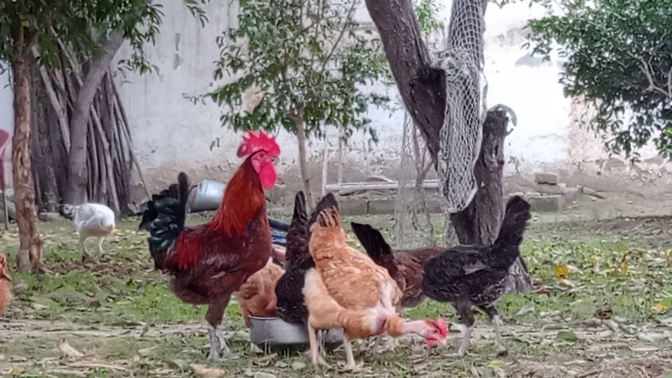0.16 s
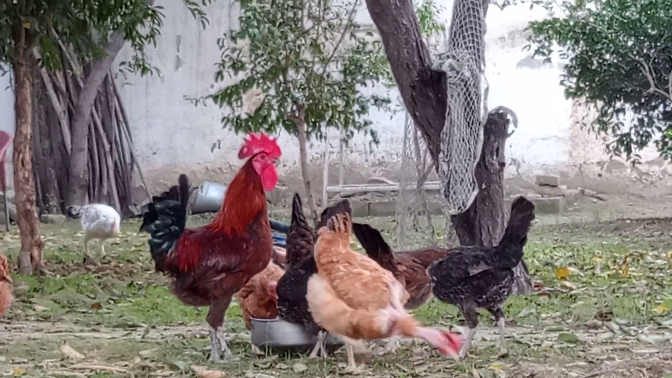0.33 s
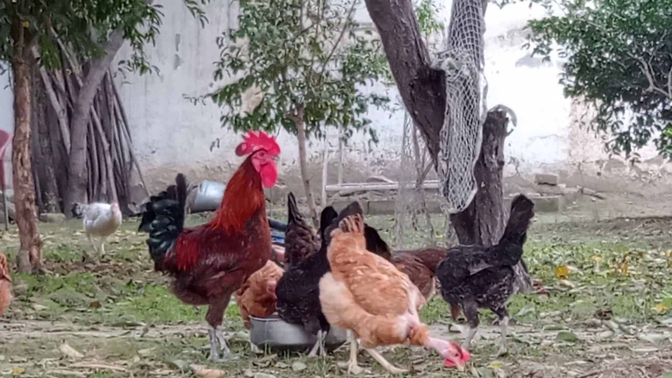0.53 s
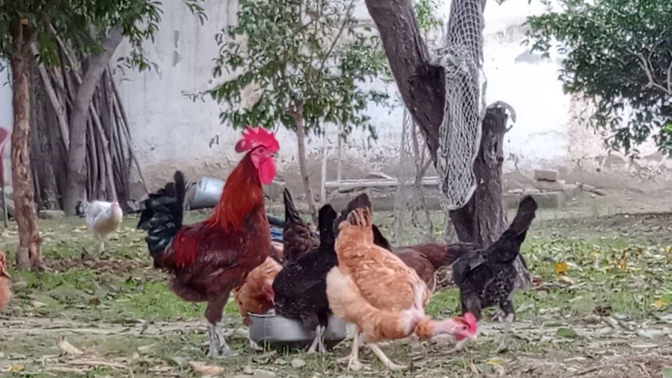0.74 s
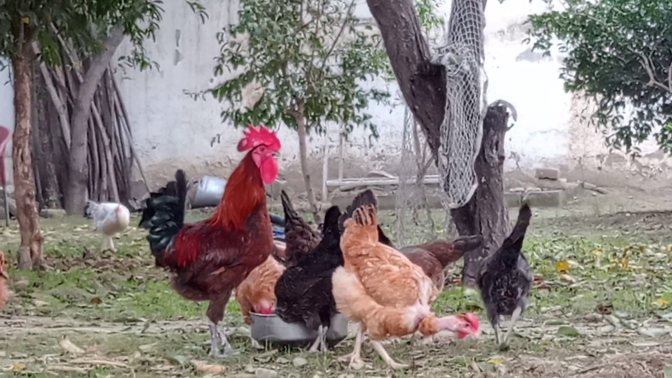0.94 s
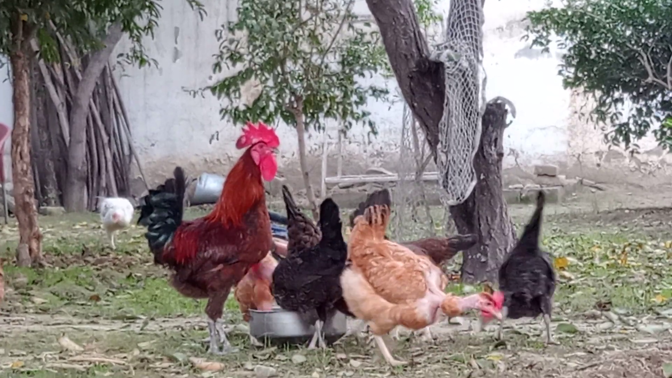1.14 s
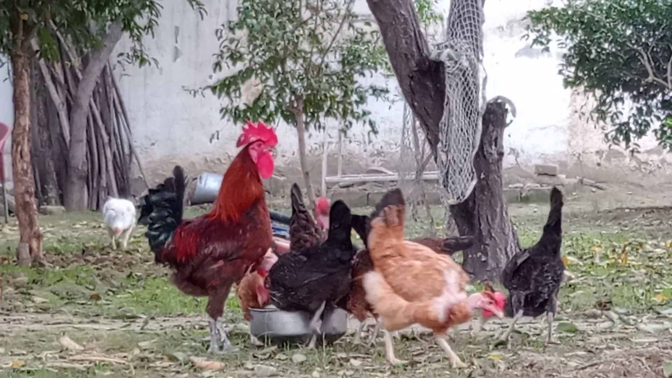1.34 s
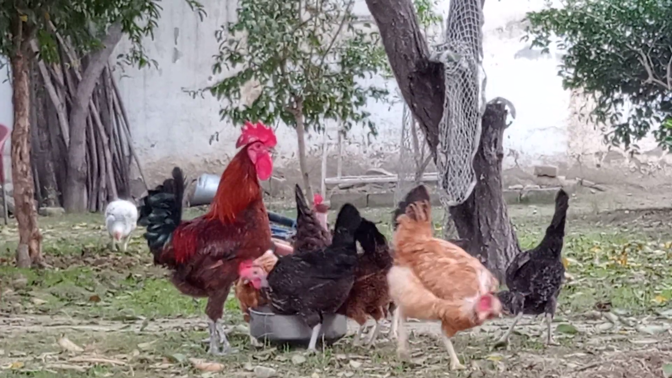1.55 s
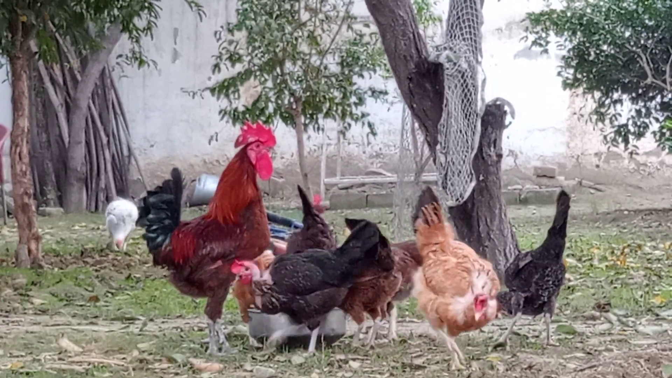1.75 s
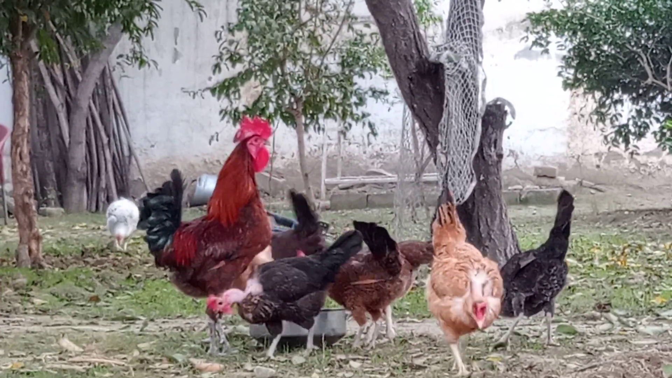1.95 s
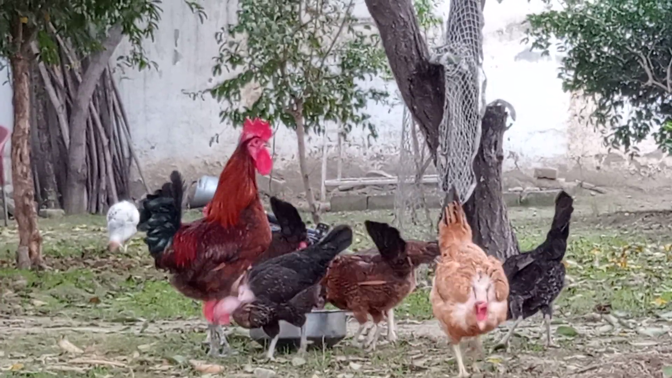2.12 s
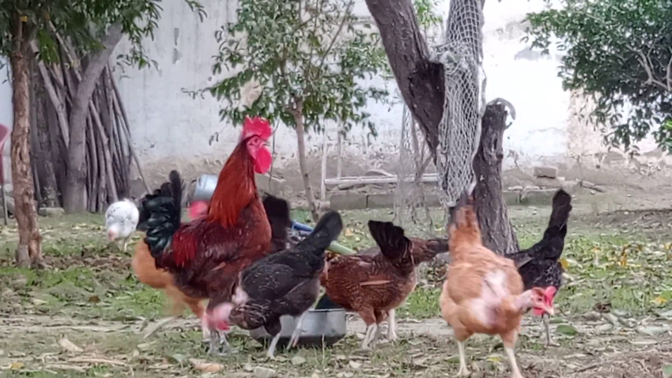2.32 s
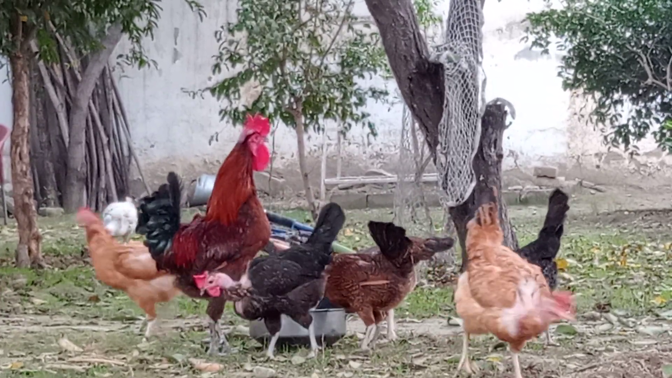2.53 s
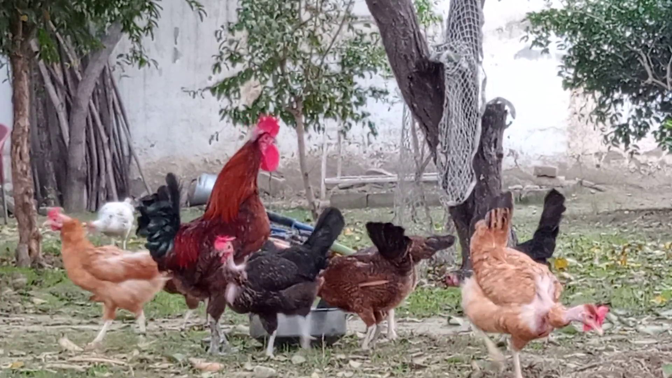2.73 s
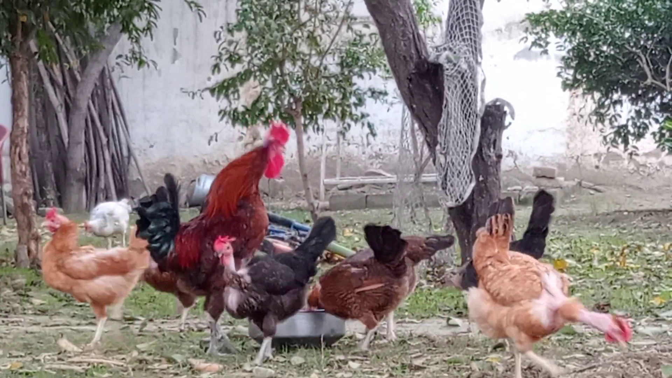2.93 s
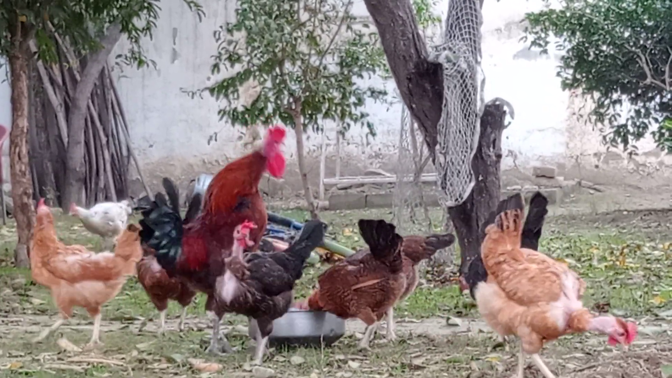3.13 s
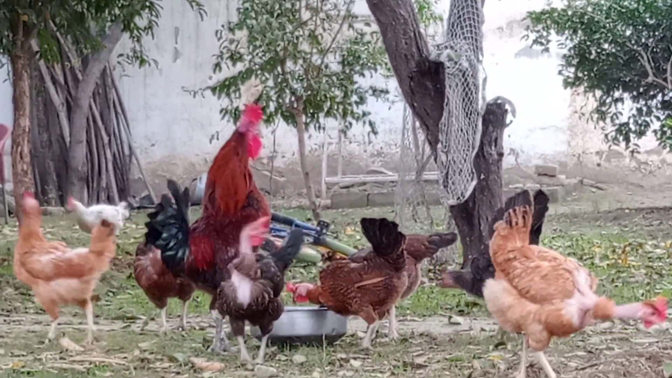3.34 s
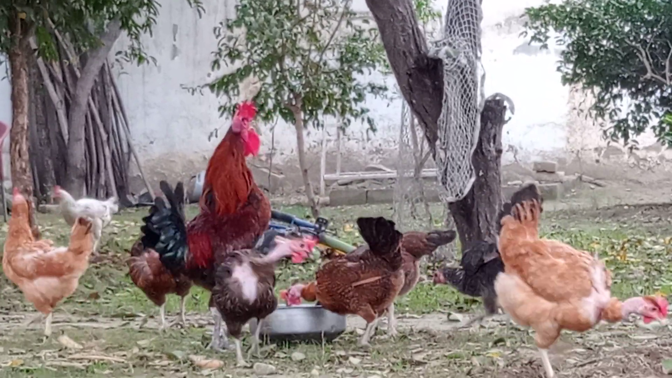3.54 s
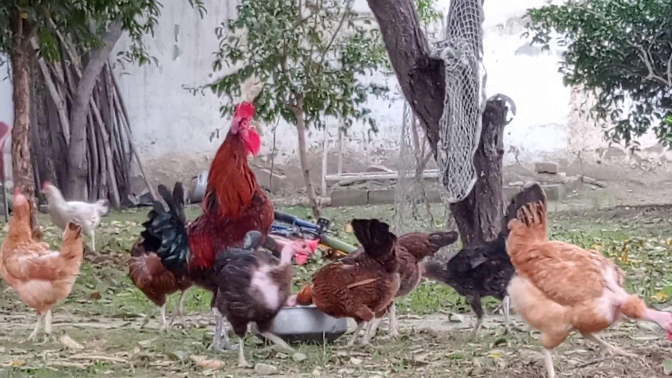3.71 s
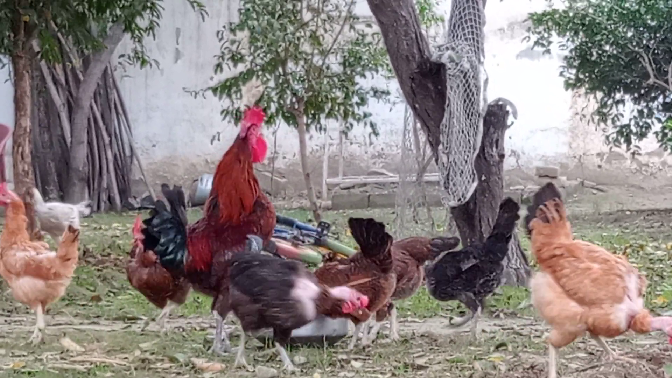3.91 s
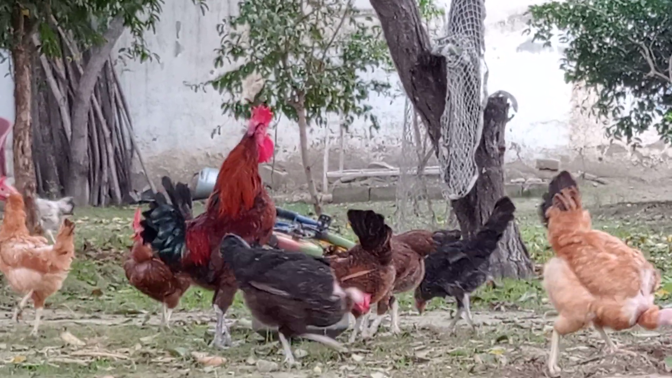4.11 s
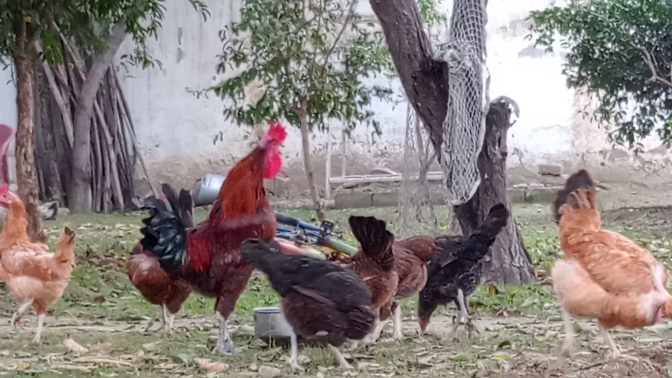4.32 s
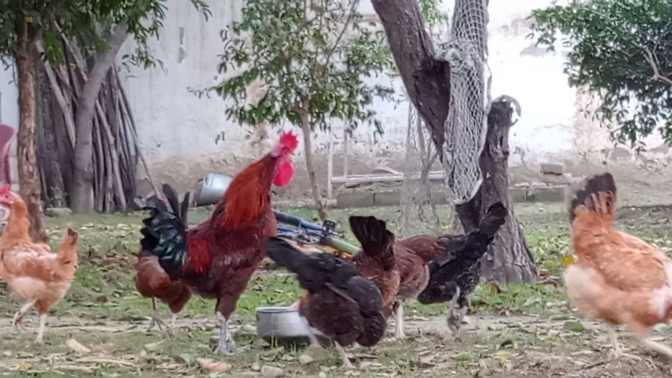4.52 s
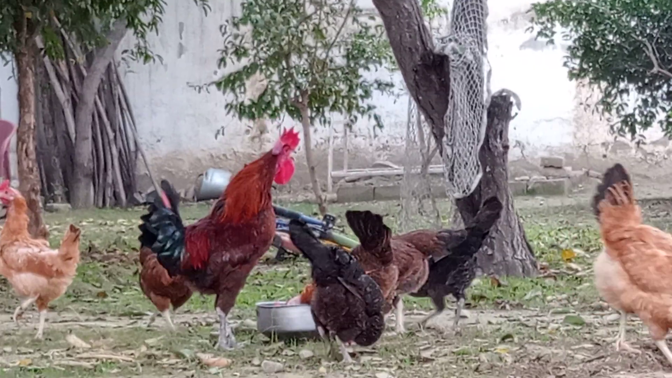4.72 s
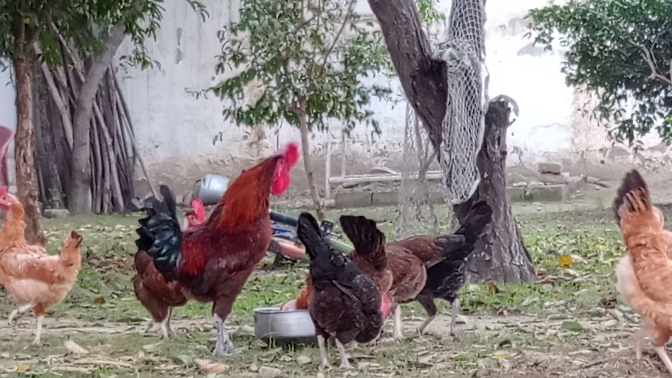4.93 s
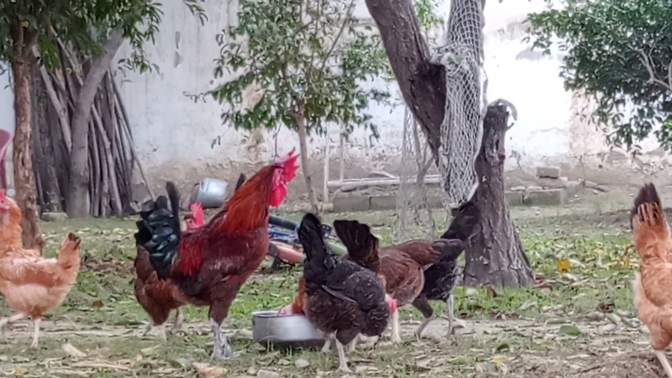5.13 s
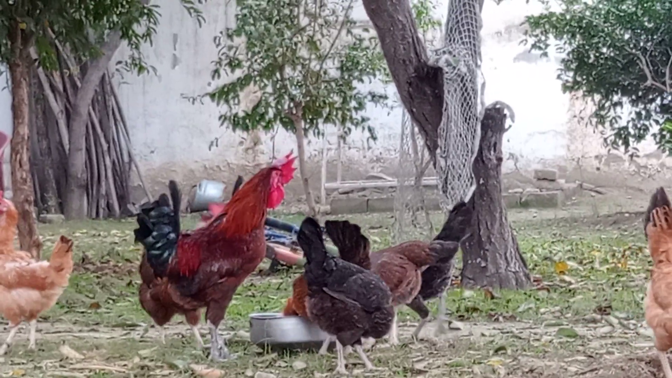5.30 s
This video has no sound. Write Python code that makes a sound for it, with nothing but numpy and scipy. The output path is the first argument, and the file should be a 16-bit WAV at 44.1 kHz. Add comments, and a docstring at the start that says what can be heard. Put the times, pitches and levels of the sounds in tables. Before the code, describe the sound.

Hen clucks, footsteps and leaf rustle over a faint traffic hum, then a rooster crows one loud three-part call that rings in the yard.

```python
"""In a walled yard that rings after him, a rooster crows three syllables: pulses excite resonances.
Before that a hen clucks and croons by slower pulses through a nearly closed throat; steps and pecks
are damped blows, scuffed dry leaves are resonated noise grains, and far birds whistle as narrow-band noise.
Distant traffic hums throughout as noise with a shaped, drifting spectrum."""
import sys
import numpy as np
from scipy import signal
from scipy.io import wavfile
from scipy.ndimage import uniform_filter1d

SR = 44100
rng = np.random.default_rng(int(sys.argv[2]) if len(sys.argv) > 2 else 0)


def wav_record(signal):
    """Record a signal, one row per channel, as 16-bit PCM in the file named by sys.argv[1]."""
    frames = np.transpose(np.atleast_2d(signal))
    bounded = np.clip(frames, -1, 1)
    # unit amplitude maps onto the largest positive 16-bit level
    quanta = np.round(bounded * 32767).astype(np.int16)
    wavfile.write(sys.argv[1], SR, quanta)


N = 236362  # length [samples]

# Resonance tables hold nominal values: tract() shifts each centre by a factor and makes two passes,
# the second narrower than the listed width.

# Traffic hum spectrum before overall scaling: (frequency [Hz], relative level [dB])
HUM_SPECTRUM = [(15, -57), (25, -32), (35, -51), (52, 0.5), (173, 0), (266, -7), (339, -7.5), (992, -19.5),
                (1450, -16), (2750, -20), (3800, -29.5), (4980, -49.5), (7060, -39), (9740, -52),
                (15400, -61)]
HUM_LEVEL_DB = -48.5
# Faint far whistles: (start [s], length [s], nominal frequency [Hz], level [dB])
FAR_BIRDS = [(2.16, 0.12, 1374, -57), (2.29, 0.12, 4720, -78), (2.4, .1, 4620, -78)]
# Decay of the yard's reverberation: (frequency [Hz], time to fall by 60 dB [s])
YARD_DECAY = [(400, 0.99), (800, 0.44), (2000, 1), (3800, 0.72), (6000, 0.85), (12000, 0.32)]
# Feet in dry leaves: (time of the loudest moment [s], level [dB])
SCUFFS = [(.02, -67), (.29, -67), (.55, -82), (.77, -60.5), (.93, -62.5), (1.07, -59.5), (1.24, -58),
          (1.5, -66), (1.821, -62), (2.0, -62.5), (2.16, -71), (2.35, -75), (2.45, -69), (2.59, -65.5),
          (2.69, -78), (2.88, -85), (3.06, -74)]
SCUFF_RISE_DB_PER_S, SCUFF_FALL_DB_PER_S = 244, 131
# Steps on soil: (time [s], level [dB], ring frequency [Hz])
THUDS = [(1.022, -27, 143), (1.084, -31.5, 138), (1.348, -31.5, 130), (1.47, -35.5, 117)]
# Pecks: (time [s], level [dB], ring frequency [Hz])
PECKS = [(1.053, -37.5, 2110), (1.2187, -33, 2140), (2.1477, -45, 2040), (2.577, -47, 2190)]

# Low clucks, then crooned notes: (start [s], length [s], level [dB], pitch [Hz],
# closing glide [share of pitch], beak opening [dB])
HEN_NOTES = [(0.707, .036, -37.5, 227.5, -0.036, -4.5), (.867, 0.037, -36.5, 235, -0.031, -1.5),
             (0.963, 0.042, -45.5, 316, 0.066, -7), (1.02, 0.119, -43.5, 328.4, 0.041, -10.5),
             (1.136, 0.059, -42.5, 322.4, 0.028, -7), (1.189, 0.079, -42, 324.5, 0.00061, -9),
             (1.258, 0.039, -39, 321.5, -0.024, -10), (1.29, 0.044, -41.5, 319, -.12, -6),
             (1.463, 0.058, -49, 334.6, -0.04, -4)]
# Hen's throat resonances: (centre [Hz], width [Hz], level [dB])
HEN_THROAT = [(318, 180, 1.5), (650, 700, -14), (937, 230, 11.5)]
# Hen's beak resonances: (centre [Hz], width [Hz], level [dB])
HEN_BEAK = [(1275, 300, 4), (1660, 1300, -3)]
NOTE_OPENS_DB = 5  # the beak parts as a note ends
NOTE_RISE_S, NOTE_FALL_S, NOTE_GLIDE_S = 0.013, 0.018, 0.017

# Crow pitch, one table a syllable: (time [s], pulse rate [Hz])
PITCH = [
    [(3.22, 613), (3.236, 596), (3.325, 614), (3.338, 623.5), (3.35, 689), (3.38, 719.5), (3.4, 677)],
    [(3.49, 616.4), (3.526, 848.7), (3.55, 799.4), (3.575, 745), (3.605, 731), (3.63, 657.5), (3.67, 753),
     (3.728, 847.7), (3.8, 812.7), (3.82, 774), (3.915, 726.5), (3.94, 628.6), (3.96, 603)],
    [(4.1, 555), (4.136, 731.6), (4.174, 740.6), (4.346, 733.5), (4.38, 772.6), (4.432, 739.3),
     (4.518, 744.6), (4.535, 722.5), (4.75, 711), (4.986, 693.5), (5.006, 670), (5.025, 615), (5.05, 480)],
]
# Crow gestures, one table a syllable: (time [s], effort [dB], every-second-pulse stress [dB], rasp [dB],
# neck tuning [factor], windpipe [dB], beak opening [dB], gape [dB], gape tuning [factor])
CROW = [
    [(3.22, -30, -38, -9, 0.9, 25.5, -2, 8, 1), (3.24, -24, -39, -4, 0.85, -7, -0.5, 17, 0.89),
     (3.325, -23, -42, -17.5, 0.84, -4, 1, 7, 0.89), (3.345, -18, -20.5, -2.5, 0.89, 4, 1, 11, .96),
     (3.375, -24.5, 0, -1, 0.89, 15.5, 15, 13, 0.93), (3.42, -39.5, -21, -7, 0.97, 8, 18, 16, 0.87)],
    [(3.49, -18, -21, -2.5, 0.98, 1.5, -19.5, -15, 1.16), (3.54, -15, -14.5, -6.5, 1.07, 1.5, 1, -1, 1.026),
     (3.58, -15, -4, -8, 1.025, 1.5, -1.5, -18, 1.12), (3.63, -19, -19, -3, 1.01, 5.5, 0.5, -14, 1.04),
     (3.69, -16.5, -5, -3, 1.1, 1.5, -3.3, -14.5, 0.77), (3.75, -14, -32, -6, 1, -3, 2.8, -2.5, 1.01),
     (3.8, -13, -14, -4.5, 1.01, 3, -1.5, -7.5, 0.88), (3.87, -17.5, -7, -5.5, 1.05, 3, -1, -16.5, 0.77),
     (3.93, -20, -3.5, -2, 0.94, 1.5, -1.5, -11, 1.13), (3.98, -25, 3, 2.5, 1.13, 16.5, 8, -11, 0.92)],
    [(4.1, -30.5, -11.5, -9.5, 0.87, 10, -1, -24, .9), (4.12, -18, -8, -17, 1.03, -2, -14, -25, 1.05),
     (4.17, -18.5, -9, -13.5, 1.01, 4, 2.5, -8.5, 1.014),
     (4.35, -19, -8, -37, 1.02, 3.7, -8.5, -8.5, 1.105),
     (4.39, -22.5, 2.5, -1.5, 1.03, -7.5, -3.5, -6.5, 0.97),
     (4.44, -18.5, -3, -16.5, 0.88, 5, 0, -3.5, 1.03), (4.62, -23, -0.5, -8.5, 0.86, -5.5, 1, 3, 0.97),
     (4.68, -20.5, 1, -16, 0.83, 1, -1, -1, 0.98), (4.8, -25, 2.5, -22, 0.97, -6, -1, -0.5, 1.033),
     (4.97, -22, -2, -11.5, 0.93, -9.5, -1, 0, 1.01), (5.022, -21, -7, -11, 1.04, -6.5, -6, 3, 0.992),
     (5.05, -34.5, -22, 5, 0.906, -11, 7, -1, 1.03)],
]
# One row a syllable: (every-fourth-pulse stress [dB], mouth [dB], beak [dB], beak tuning [factor])
POSTURE = [(-33, -17, -7.5, 0.92), (-28, 1.5, -6.5, 0.981), (-38, 2, -4.5, 0.981)]
# Rooster's throat resonances, following the pitch: (centre [Hz], width [Hz], level [dB])
THROAT = [(727, 240, -2), (1194, 670, -12.5)]
# Windpipe resonances, tuned by the neck: (centre [Hz], width [Hz], level [dB])
WINDPIPE = [(1498.6, 89, 0), (1653.6, 66, 3), (1830, 28, -1), (2066, 220, -20.5)]
# Gape resonances: (centre [Hz], width [Hz], level [dB])
GAPE = [(3037, 184, -20.5), (3679, 256, -10), (4020, 140, -17)]
# Mouth resonances: (centre [Hz], width [Hz], level [dB])
MOUTH = [(2619, 170, -14.5), (2849, 144, -20.5)]
# Beak resonances: (centre [Hz], width [Hz], level [dB])
BEAK = [(5060, 530, -25), (5925, 410, -26.5), (6900, 360, -35), (7690, 374, -25), (8630, 680, -35.5),
        (10240, 1500, -49), (12760, 1000, -53), (14530, 1200, -48.5)]
# Windpipe overtone heard through the beak, tuned by the neck: (centre [Hz], width [Hz], level [dB])
PIPE_OVERTONE = [(6370, 500, -25)]
MOUTH_FOLLOWS = 0.78  # the mouth resonances follow the beak opening [dB per dB]
BEAK_WANDER = 0.01  # rms drift of the beak tuning factor
STRESS_RISE_DB, STRESS_TOP_DB = 0.48, 0.5  # half-pitch lines gain per line number, up to a ceiling
RISE_S, FALL_S = 0.013, 0.017

EDGE_HZ = 15530  # upper band limit


def gain_of(db):
    """Level law: 20 dB is a tenfold amplitude."""
    return 10 ** (np.asarray(db) / 20)


def evened(x):
    """Normalization to unit rms."""
    return x / np.sqrt(np.mean(x ** 2) + 1e-20)


def read(points, hz):
    """Interpolation of a curve along a logarithmic frequency axis."""
    f, value = np.transpose(points)
    return np.interp(np.log(hz + 1), np.log(f + 1), value)


def add(mix, s, sound):
    """Superposition: a sound starting at s seconds adds to the mix in place."""
    part = mix[round(s * SR):][:len(sound)]
    part += sound[:len(part)]


def curves(rows):
    """Linear interpolation of a table's columns, sample by sample, with their start time."""
    s, *columns = np.transpose(rows)
    t = np.arange(s[0], s[-1], 1 / SR)
    return s[0], [np.interp(t, s, c) for c in columns]


def wobble(length, span):
    """Low-passed chance: noise averaged twice over span samples, at unit rms."""
    x = rng.standard_normal(length)
    return evened(uniform_filter1d(uniform_filter1d(x, int(span)), int(span)))


def resonate(x, hz, width):
    """Heterodyne resonance of unit gain: shift the curve hz to zero, smooth, and shift back."""
    turn = np.exp(2j * np.pi * np.cumsum(hz * np.ones(len(x))) / SR)
    r = np.exp(-np.pi * width / SR)
    return 2 * (turn * signal.lfilter([1 - r], [1, -r], x / turn + 1e-18)).real


def tract(x, modes, factor):
    """Parallel resonances, each steepened by two passes; opposite signs keep the valleys deep."""
    total = 0
    for k, (hz, width, db) in enumerate(modes):
        centre = hz * factor
        steep = resonate(resonate(x, centre, width), centre, width * 0.83)
        total = total + (-1) ** k * gain_of(db) * steep
    return total


def hum():
    """Spectral synthesis: random short-time spectra with drifting patches and a slow swell."""
    frames, hz = N // 256 + 5, np.fft.rfftfreq(1024, 1 / SR)
    a, b, patches = rng.standard_normal((frames, 513, 3)).T
    patches = uniform_filter1d(patches, size=10, axis=0)  # across frequency
    patches = evened(uniform_filter1d(patches, size=14, axis=1))  # across time
    level_db = read(HUM_SPECTRUM, hz)[:, None] + 1.5 * patches + 0.8 * wobble(frames, 25)
    noise = signal.istft((a + 1j * b) * gain_of(level_db), nperseg=1024, noverlap=768)[1]
    return gain_of(HUM_LEVEL_DB) * evened(noise[:N])


def far_birds():
    """Narrow-band noise: a sharp resonance turns noise into fuzzy whistles from beyond the wall."""
    out = np.zeros(N)
    for s, length, hz, db in FAR_BIRDS:
        whistle = evened(tract(rng.standard_normal(SR // 4), [(hz, 30, 0)], 0.94))
        whistle = whistle[:round(length * SR)]
        add(out, s, gain_of(db) * whistle * signal.windows.tukey(len(whistle), 0.6))
    return out


def yard(x):
    """Reverberation by convolution: sparse taps of random sign, each band dying at its own speed."""
    taps = np.zeros(SR)
    at = np.arange(500, SR - 20, 20)
    taps[at + rng.integers(0, 20, at.shape)] = rng.choice([-1., 1.], at.shape)
    hz, t, z = signal.stft(taps, SR, nperseg=256)
    decay = gain_of(-60 * t / read(YARD_DECAY, hz)[:, None])
    tail = signal.istft(z * decay, SR, nperseg=256)[1]
    return signal.fftconvolve(x, tail / np.linalg.norm(tail))[:N]


def leaves():
    """Resonated grain noise: dry leaves crackle densely; each scuff swells fast and dies slower."""
    t = np.arange(0, N + 64, 64) / SR
    scuffing = np.zeros(len(t))
    for s, db in SCUFFS:
        drop_db = np.maximum(SCUFF_RISE_DB_PER_S * (s - t), SCUFF_FALL_DB_PER_S * (t - s))
        scuffing += gain_of(db - drop_db)
    grains = rng.standard_normal(N) * gain_of(2.7 * wobble(N, 300))
    crackle = evened(tract(grains, [(3500, 760, 9.5), (7270, 1700, -3)], 0.96))
    return np.interp(np.arange(N) / SR, t, scuffing) * crackle


def knocks(table, t60, noisy):
    """Damped free vibration: short blows give a dull ring with some scatter just above it."""
    out, t = np.zeros(N), np.arange(4000) / SR
    for s, db, hz in table:
        fade = gain_of(db - 60 * t / t60) * (1 - np.exp(-(t / 0.004) ** 2))  # soft contact
        burst = fade * rng.standard_normal(len(t))
        scatter = tract(burst, [(1.15, hz * 0.57, 0)], hz) * np.sqrt(SR / hz)  # centred at 1.15 hz
        add(out, s, fade * np.sin(2 * np.pi * hz * t) + noisy * scatter)
    return out


def cluck(s, length, db, pitch_hz, glide, beak_db):
    """Source and filter: slower, throbbing pulses pass a nearly closed throat."""
    t = np.arange(0, length, 1 / SR)
    left = length - t
    fall = np.clip(left / NOTE_FALL_S, 0, 1)
    hz = pitch_hz * (1 + glide * np.clip(1 - left / NOTE_GLIDE_S, 0, 1))
    turns = np.cumsum(hz * (1 + 0.029 * wobble(len(t), 146))) / SR
    pulses = evened(sum(np.cos(2 * np.pi * k * turns) for k in range(1, 10)))
    drive = pulses + 0.55 * rng.standard_normal(len(t))
    opening = gain_of(beak_db + NOTE_OPENS_DB * (1 - fall))
    voice = evened(tract(drive, HEN_THROAT, 0.93) - opening * tract(drive, HEN_BEAK, 0.98))
    rise = np.sin(np.pi / 2 * np.clip(t / NOTE_RISE_S, 0, 1))
    return s, gain_of(db + 2.5 * wobble(len(t), 160)) * voice * rise * fall


def membrane_pulses(hz, half_db, fourth_db, rasp):
    """Subharmonic series: uneven pulses add lines at half the pitch and sidebands at a quarter of it."""
    length = len(hz)
    jitter = 0.023 * rasp * wobble(length, 150) + 0.0235 * rasp * wobble(length, 585)
    turns = np.cumsum(hz * (1 + jitter)) / SR
    pulses = np.zeros(length)
    for k in range(1, 52):  # odd k: lines between the harmonics
        stress_db = np.minimum(half_db + STRESS_RISE_DB * k, np.maximum(half_db, STRESS_TOP_DB)) * (k % 2)
        flutter_db = min(0.14 * k, 5.0) * wobble(length, 1500)  # high lines fade in and out
        level = gain_of(stress_db + flutter_db) * np.clip(31 - k * hz / 1000, 0, 1)
        smear = 0.15 * k * (rasp + 0.048) * wobble(length, 150)
        pulses += level * np.cos(np.pi * k * turns + 2 * np.pi * rng.random() + smear)
    return pulses * (1 + 2 * gain_of(fourth_db) * np.cos(np.pi / 2 * turns)) / 2.0


def syllable(pitch, rows, posture):
    """Source and filter: uneven, raspy membrane pulses pass throat, windpipe and the open beak."""
    s, (effort_db, half_db, rasp_db, neck, pipe_db, open_db, gape_db, gape) = curves(rows)
    fourth_db, mouth_db, beak_db, beak = posture
    rasp, length = gain_of(rasp_db), len(neck)
    hz = np.interp(s + np.arange(length) / SR, *np.transpose(pitch))
    pulses = membrane_pulses(hz, half_db, fourth_db, rasp)
    drive = pulses * (1 + 0.24 * rasp * wobble(length, 170)) + rasp * rng.standard_normal(length)

    voice = tract(drive, THROAT, hz / 740)
    voice += gain_of(pipe_db) * tract(drive, WINDPIPE, neck)
    voice += gain_of(gape_db) * tract(drive, GAPE, gape)
    mouth_gain = gain_of(mouth_db + MOUTH_FOLLOWS * open_db)
    voice -= mouth_gain * tract(drive, MOUTH, np.maximum(neck, 0.93))
    rush = drive + 0.14 * rng.standard_normal(length)  # air rushes through the shifting beak
    through_beak = tract(rush, BEAK, beak + BEAK_WANDER * wobble(length, 3700))
    through_beak += tract(rush, PIPE_OVERTONE, neck)
    voice += gain_of(beak_db + open_db) * through_beak
    # the throat wall leaks the lowest line, near half the pitch, less so with rasp
    leak = tract(pulses, [(0.98, 39.2, 0)], hz / 2)
    voice += gain_of(-16.0) * np.clip(1 - rasp, 0, 1) * leak

    # level out the running rms so that effort sets the loudness
    steady = voice / np.sqrt(uniform_filter1d(voice ** 2, size=1500) + 1e-9)
    edge = np.minimum(np.arange(length) / RISE_S, np.arange(length)[::-1] / FALL_S) / SR
    return s, gain_of(effort_db) * steady * np.sin(np.pi / 2 * np.clip(edge, 0, 1)) ** 2


def scene():
    """Superposition of background, hen and rooster, direct and reverberated by the yard."""
    hen = knocks(THUDS, t60=0.09, noisy=0.56) + knocks(PECKS, t60=0.038, noisy=0.67)
    for row in HEN_NOTES:
        add(hen, *cluck(*row))
    rooster = np.zeros(N)
    for pitch, rows, posture in zip(PITCH, CROW, POSTURE):
        add(rooster, *syllable(pitch, rows, posture))
    ringing = yard(gain_of(-7.5) * rooster + gain_of(-16) * hen)
    return (hum() + far_birds() + leaves() + hen + rooster + ringing)[None]


def record(dry):
    """Band limitation: the microphone hisses faintly and drops the deepest bass; then the treble ends."""
    hissing = dry + gain_of(-85.0) * rng.standard_normal(dry.shape)
    thin = signal.sosfilt(signal.butter(6, 48, "high", fs=SR, output="sos"), hissing)
    low_pass = signal.firwin(1023, EDGE_HZ, window=("kaiser", 9), fs=SR)
    return signal.oaconvolve(thin, low_pass[None], "same")


dry = scene()
out = record(dry)
wav_record(out)
```